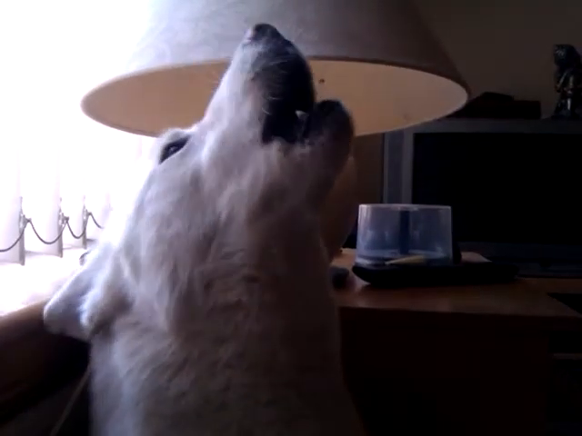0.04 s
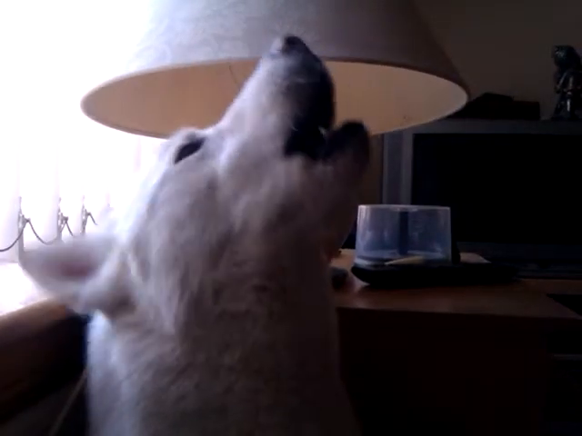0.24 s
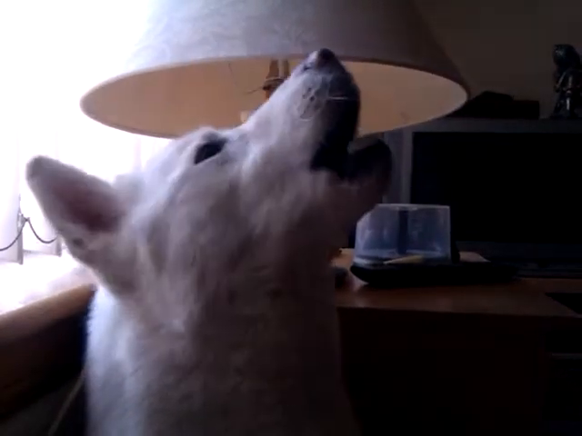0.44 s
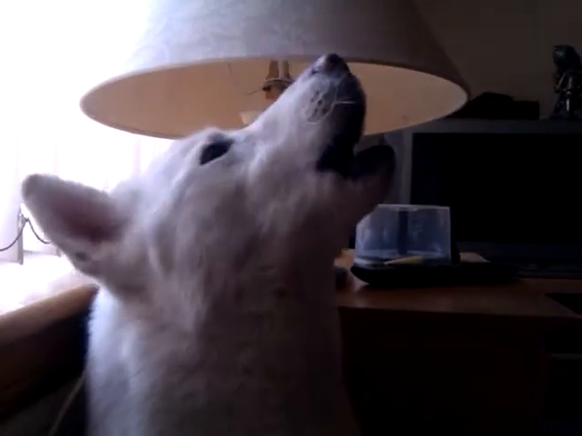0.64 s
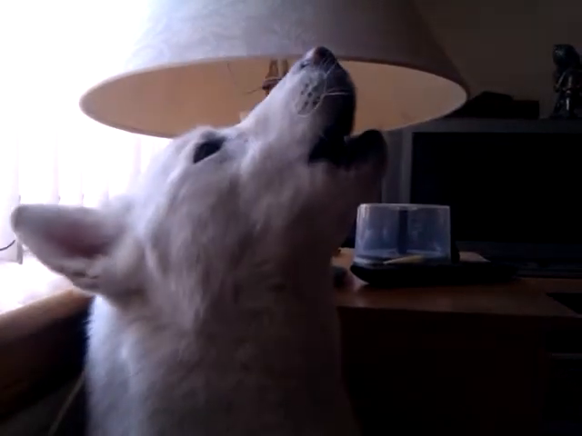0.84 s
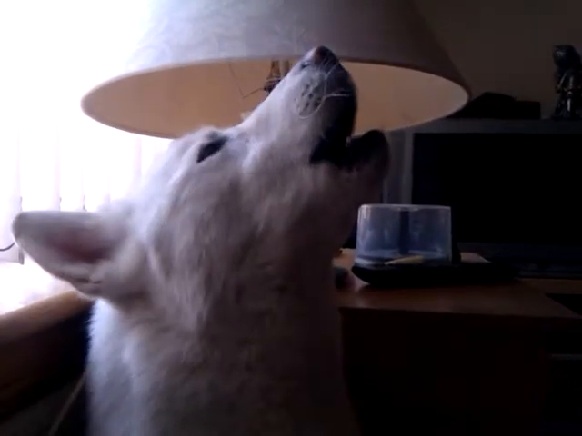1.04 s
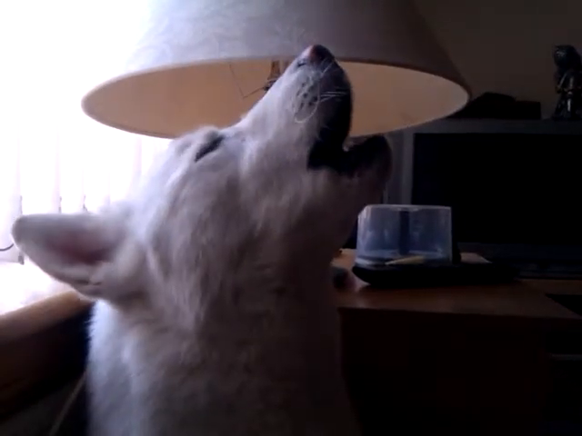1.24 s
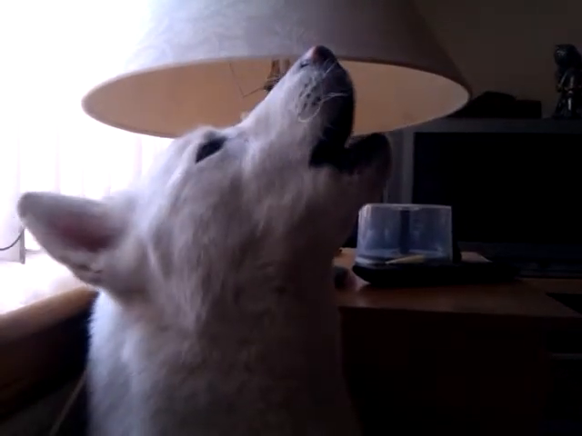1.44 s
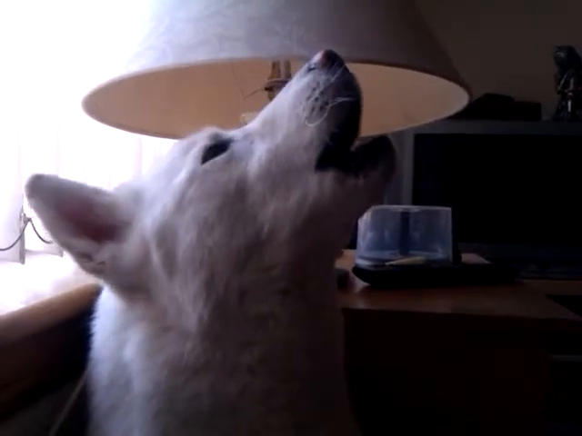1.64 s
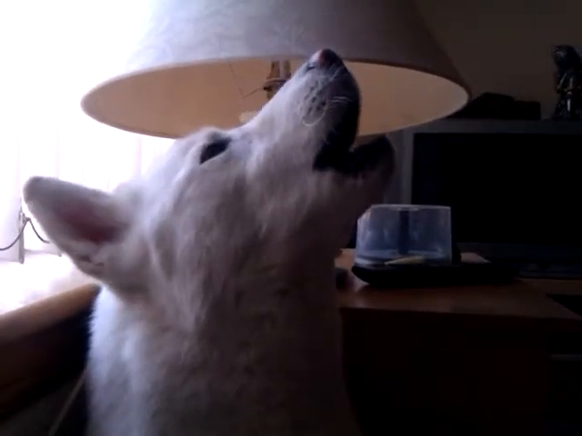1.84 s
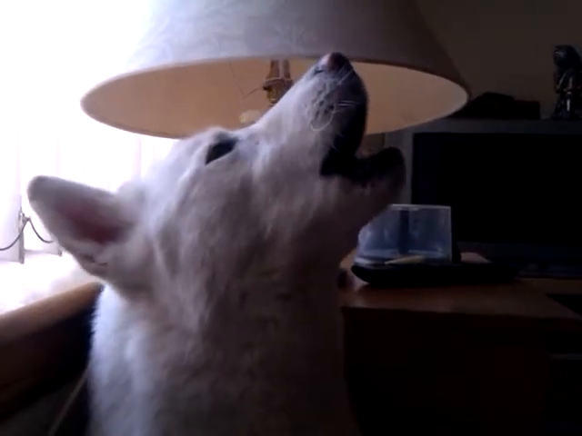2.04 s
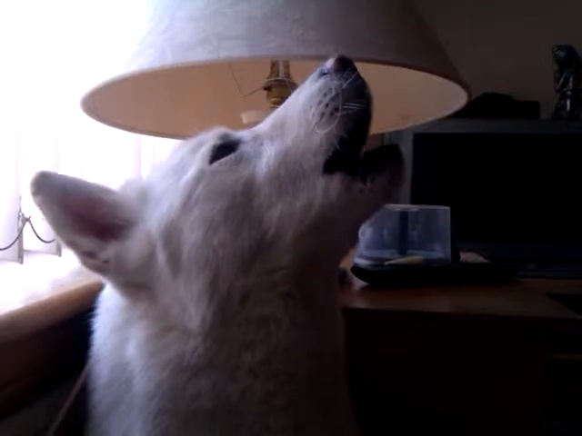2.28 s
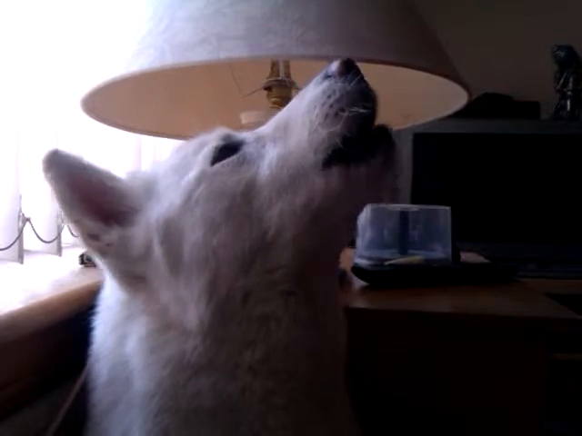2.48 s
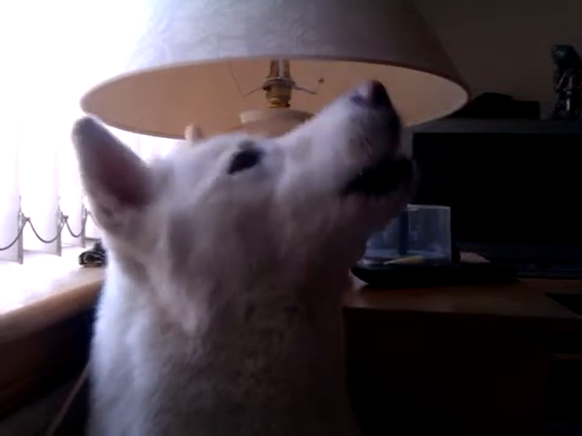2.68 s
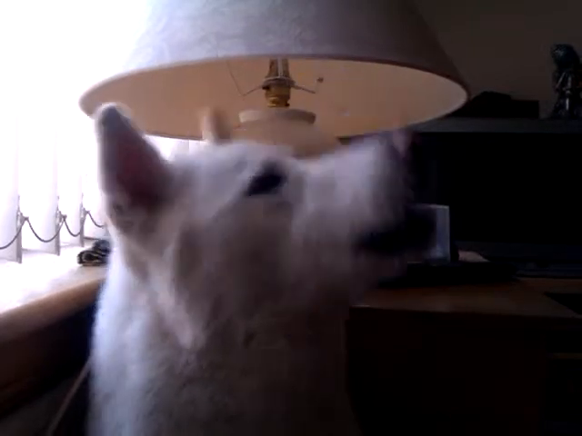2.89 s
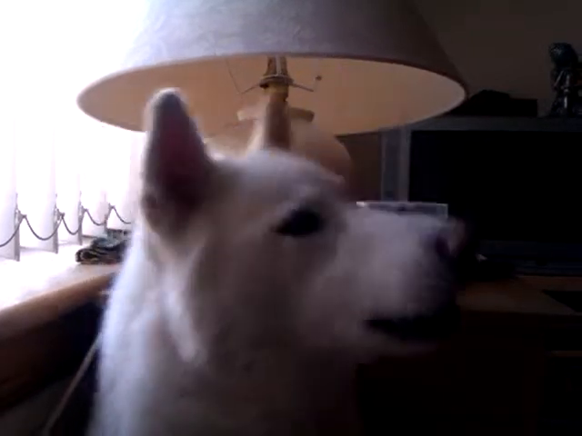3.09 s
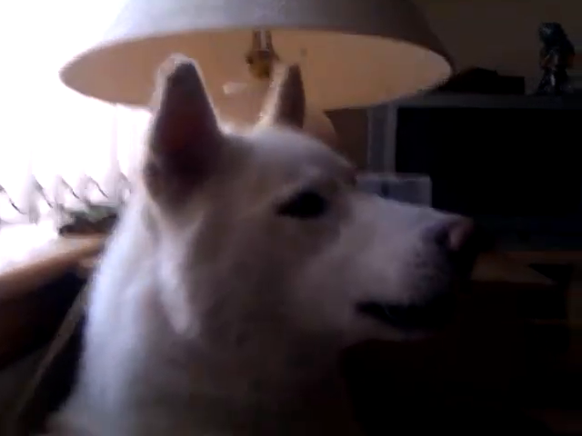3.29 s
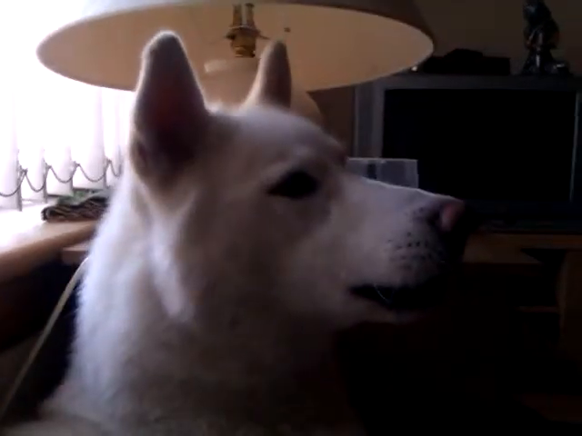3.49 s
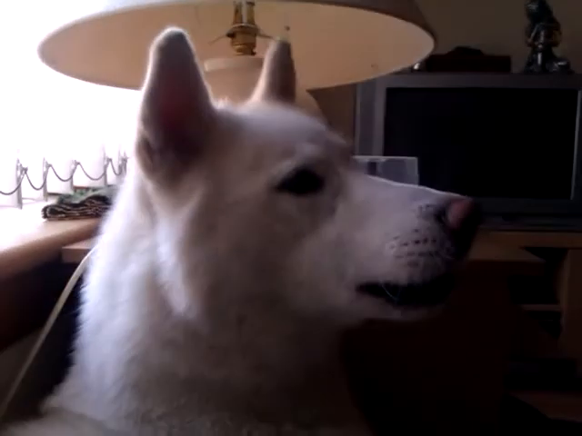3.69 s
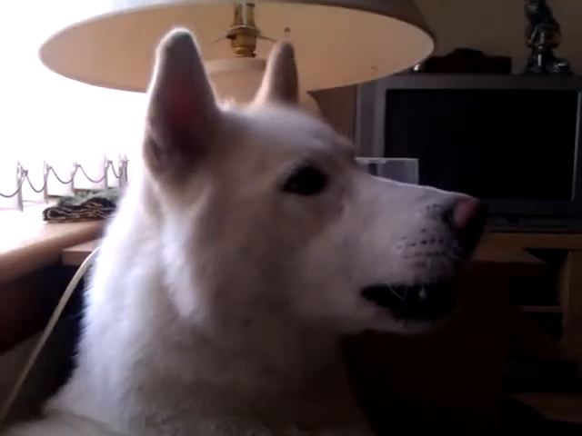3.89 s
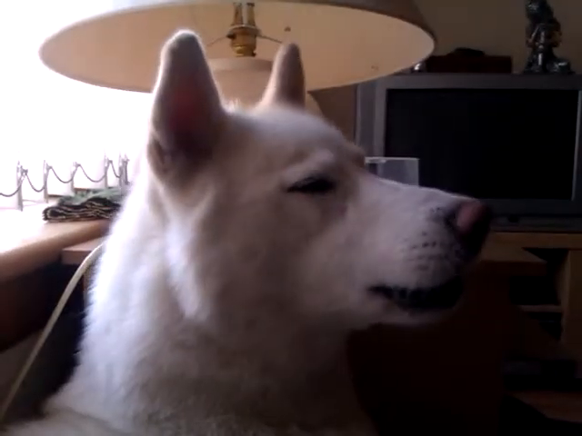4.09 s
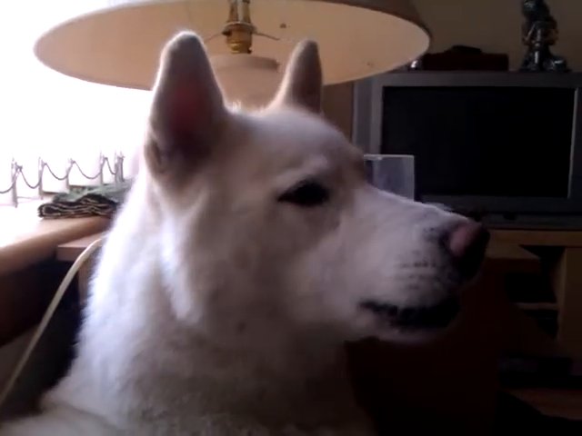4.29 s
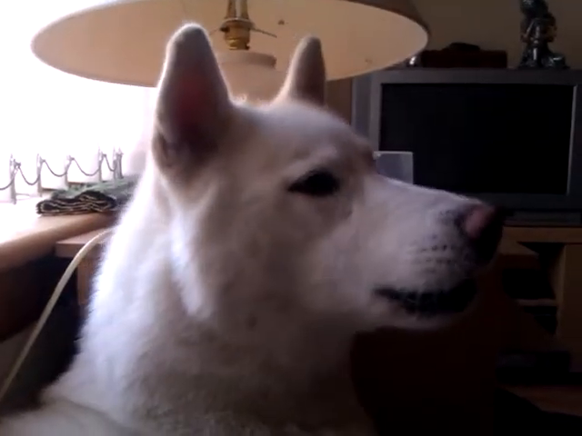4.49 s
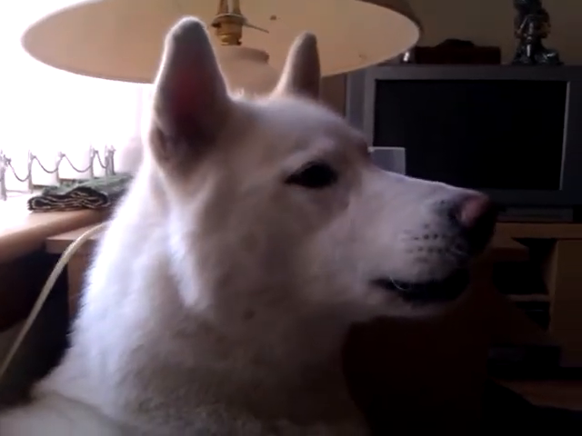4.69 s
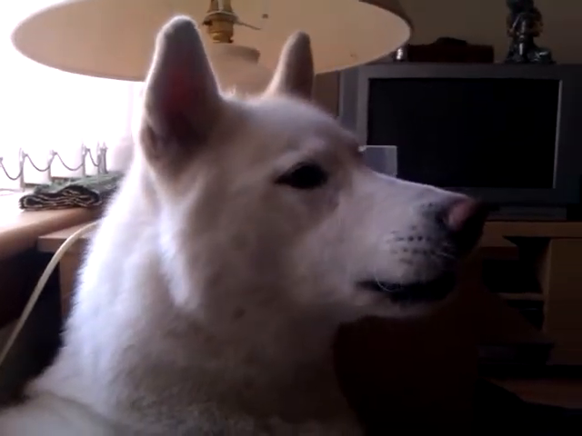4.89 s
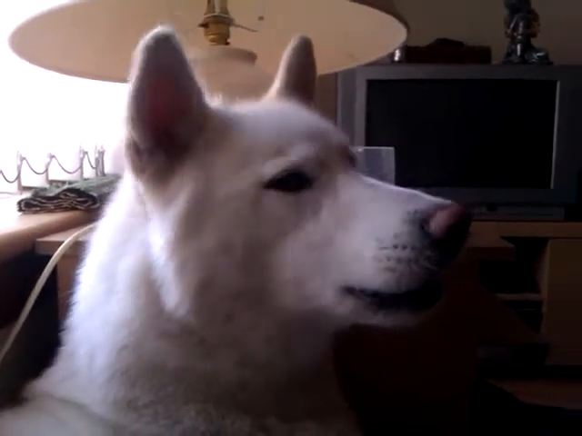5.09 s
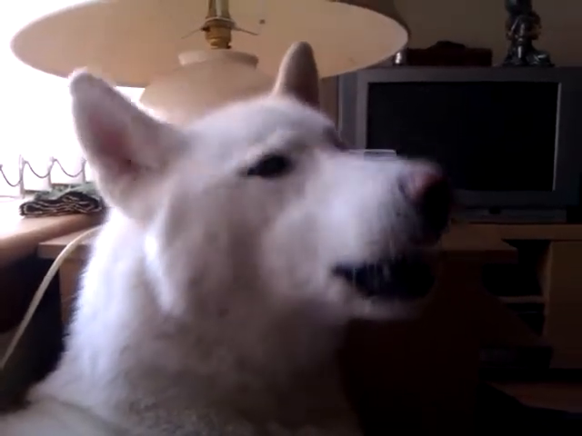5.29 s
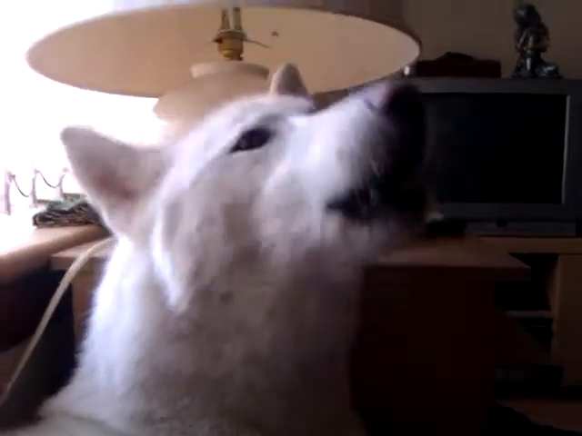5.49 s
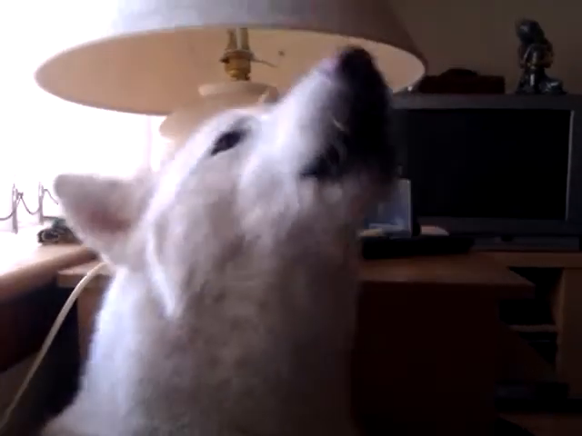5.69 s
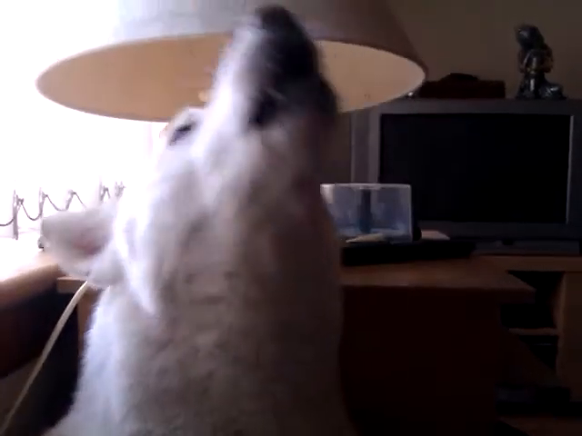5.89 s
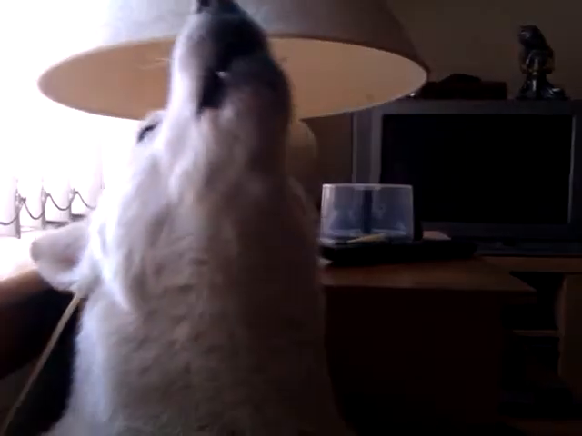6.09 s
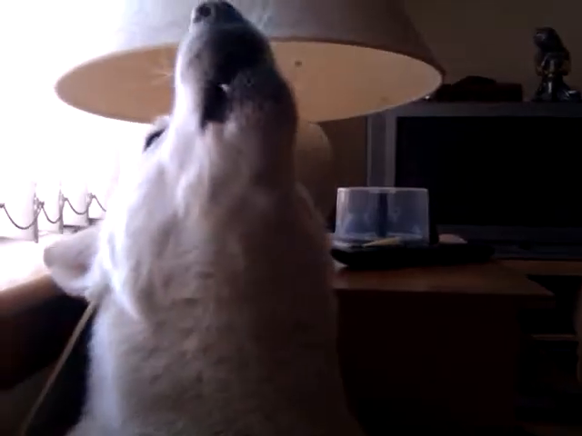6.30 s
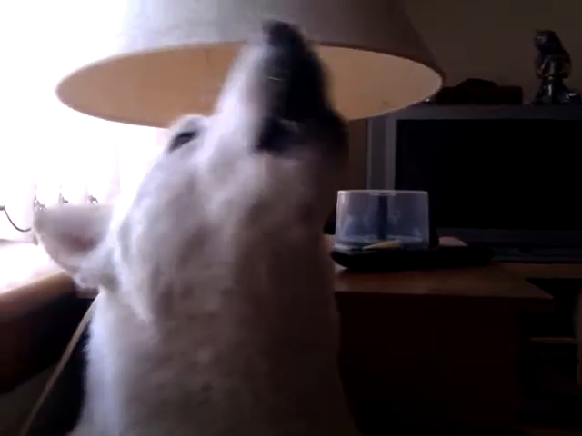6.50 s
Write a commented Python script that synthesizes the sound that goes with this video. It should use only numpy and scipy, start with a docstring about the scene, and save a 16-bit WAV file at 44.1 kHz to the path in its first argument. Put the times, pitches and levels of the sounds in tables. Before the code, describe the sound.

Two loud dog howls in a living room, overloading the microphone, separated by a quiet gap of hiss and small wet mouth clicks.

```python
"""In a living room a dog howls twice, close to a small camera; the first howl is already under way.
Harmonics of the vocal folds pass a throat resonance and the mouth; a second vibration beats against them.
The second howl starts as a hoarse grumble that breaks between registers.
The mouth clicks softly, mostly in the pause, and air whistles in the nose as the first howl ends.
The room answers over steady hiss, and the loud notes overload the camera's input."""
import sys
import numpy as np
from scipy import signal
from scipy.fft import rfft, irfft, next_fast_len
from scipy.io import wavfile
from scipy.ndimage import map_coordinates

SR = 44100
rng = np.random.default_rng(int(sys.argv[2]) if len(sys.argv) > 2 else 0)


def generate_wav(signal):
    """Clip the signal to [-1, 1] and save it as 16-bit WAV at the path in sys.argv[1]."""
    frames = np.transpose(np.atleast_2d(signal))
    scaled = np.clip(frames, -1, 1) * 32767
    pcm = np.round(scaled).astype(np.int16)
    wavfile.write(sys.argv[1], SR, pcm)


N = 288414  # length in samples


def amp(db):
    """Decibels to amplitude: 20 dB is a factor of ten."""
    return 10 ** (np.asarray(db) / 20)


def along(points, hz):
    """Interpolation of (Hz, value) points on a logarithmic frequency axis."""
    point_hz, value = np.transpose(points)
    return np.interp(np.log(hz + 1), np.log(point_hz + 1), value)


def stretch(rows):
    """Linear interpolation in time: sample indices of a table, a soft-edged gate and a curve per column."""
    edge_s = .006
    s, *columns = np.transpose(rows)
    at = np.arange(max(round(s[0] * SR), 0), min(round(s[-1] * SR) + 200, N))
    # no fade where the sound is cut by the first or the last sample
    from_start = at - at[0] + (at[0] == 0) * SR
    to_end = at[-1] - at + (at[-1] == N - 1) * SR
    gate = np.clip(np.minimum(from_start, to_end) / (edge_s * SR), 0, 1)
    return at, gate, [np.interp(at / SR, s, column) for column in columns]


def spells(rows, t, edge_s):
    """Superposition of (start, end, amount) spells that fade in and out over edge_s."""
    return sum(amount * np.clip(np.minimum(t - start, end - t) / edge_s, 0, 1)
               for start, end, amount in rows)


def wobble(size, rate):
    """Band-limited randomness: a smooth curve through random knots, rate of them a second."""
    knots = rng.standard_normal(int(size * rate / SR) + 4)
    return map_coordinates(knots, [np.arange(size) * rate / SR])


def filtered(x, response):
    """Linear filtering: the spectrum of x times a response of frequency."""
    m = next_fast_len(N + SR)
    return irfft(rfft(x, m) * response(np.fft.rfftfreq(m, 1 / SR)), m)[..., :N]


def dog():
    """Source and filter: vocal-fold harmonics, the upper ones coloured by the mouth, plus side sounds."""
    # Voiced stretches between register breaks. Each row: time in seconds, pitch in Hz, level of the three
    # lowest harmonics in dB, throat resonance as a multiple of the pitch, level of the upper harmonics in dB
    # ahead of the mouth's colour.
    held = [(0.0, 475.9, -5, 1.2, -44), (0.2, 473.7, -7, 1.27, -40.5), (0.55, 473, -8.5, 1.27, -41.5),
            (0.67, 477, -9, 1.25, -43), (0.71, 477, -10.5, 1.2, -56), (0.79, 472.3, -9.5, 1.22, -54.5),
            (0.85, 465.9, -7, 1.27, -39), (0.95, 464.3, -7, 1.27, -45), (1.1, 467.7, -6.5, 1.23, -42),
            (1.27, 472.1, -7.5, 1.29, -42.5), (1.35, 482.8, -5.5, 1.28, -46), (1.42, 497.2, 1.5, 0.97, -41),
            (1.49, 504.5, 1, 0.93, -42), (1.56, 497.7, 2.5, 1.04, -45), (1.65, 486.3, -4, 1.25, -42.5),
            (1.85, 481.7, -6, 1.3, -44.5), (1.9, 479.7, -10.5, 1.33, -58), (1.98, 482.5, -5, 1.28, -42.5),
            (2.07, 493.4, -2, 1.13, -44), (2.13, 505.4, 0, 0.95, -41), (2.15, 508.2, -5, 0.95, -45),
            (2.175, 521.2, -20.5, 1.05, -60), (2.2, 508.1, -17, 1.25, -52), (2.24, 508.8, -8, 1.13, -50.5),
            (2.27, 520.7, -15, 1.4, -44)]
    flick = [(2.265, 511, -11.5, 2.05, -53.5), (2.295, 587, -14.5, 1.5, -48.5),
             (2.334, 597, -19, 1.72, -58), (2.356, 640, -20, 1.5, -70), (2.38, 657, -37, 1.9, -75)]
    grumble = [(3.845, 150, -54, 1.15, -84), (3.891, 270, -34.5, 1.3, -63),
               (3.902, 301.8, -32.5, 1.68, -48.5), (3.969, 328.9, -27, 1.56, -49.5),
               (3.99, 367, -28.5, 1.5, -47), (4.05, 376, -24.5, 1.38, -45), (4.101, 411.2, -25, 1.42, -42),
               (4.155, 429, -18, 1.88, -42.5), (4.202, 415.2, -24, 1.52, -45),
               (4.231, 394.3, -23, 1.63, -45), (4.325, 372, -22.5, 1.58, -46)]
    low_register = [(4.32, 244.4, -17.5, 2.8, -53), (4.391, 260, -27, 4.4, -42),
                    (4.445, 242, -19, 2.65, -46.5), (4.5, 231.2, -21.5, 2.6, -50),
                    (4.591, 247.8, -19.5, 2.38, -45), (4.62, 312, -19.5, 2.15, -53)]
    rise = [(4.615, 346.8, -17.5, 1.9, -52), (4.652, 350, -21, 1.57, -52), (4.701, 379, -16.5, 1.4, -47),
            (4.751, 404.3, -14, 1.54, -47), (4.8, 397, -14.5, 1.55, -44.5), (4.87, 385, -18, 1.58, -48.5),
            (4.96, 384, -19.5, 1.43, -48.5), (5.049, 391, -16.5, 1.58, -48),
            (5.15, 411.6, -15.5, 1.49, -46), (5.21, 419.3, -14, 1.68, -46),
            (5.25, 426.1, -12.5, 1.45, -44.5), (5.318, 461, -9.5, 1.6, -36), (5.37, 462.8, -7, 1.86, -34.5),
            (5.45, 449.9, -2, 1.87, -40), (5.56, 432.5, 0, 1.98, -43.5), (5.582, 433.7, -0.5, 1.98, -42.5)]
    last = [(5.585, 490, -10, 1.5, -30), (5.61, 475.5, -7, 1.46, -33), (5.65, 467.3, -9, 1.58, -46),
            (5.74, 452.2, -8.5, 1.56, -42), (5.78, 444, -5.5, 1.4, -43), (5.87, 438.3, -4.5, 1.47, -43.5),
            (6.03, 433.5, -3, 1.49, -45), (6.12, 439.9, -2, 1.42, -43), (6.3, 441.4, -2.5, 1.474, -40.5),
            (6.54, 450.7, -2, 1.6, -42)]
    # Colour of the upper harmonics, lips nearly shut and mouth open. Each row: frequency in Hz, gain in dB.
    shut_shape = [(700, 5.5), (1100, -1.5), (1400, -16), (1850, 8.5), (2100, -4.5), (2420, 6.5),
                  (2750, -12.5), (3200, -2.5), (3900, -18), (4600, -35), (6400, -29), (7500, -52),
                  (11000, -75)]
    open_shape = [(700, 6.5), (1000, 15.5), (1500, 11), (1950, -6.5), (2450, 6.5), (2900, -4), (3600, -14),
                  (4500, -38.5), (6300, -16), (7600, -14), (9300, -34), (10500, -71.5)]

    def coloured(buzz, shape):
        # the lowest frequencies, under 330 Hz, are cut as well
        return filtered(buzz, lambda hz: amp(along(shape, hz)) / (1 + (330 / (hz + 1)) ** 6))

    second = second_vibration()
    stretches = (held, flick, grumble, low_register, rise, last)
    low, buzz = sum(voice(rows, second) for rows in stretches)
    opening = opening_at(np.arange(N) / SR)
    upper = (1 - opening) * coloured(buzz, shut_shape) + opening * coloured(buzz, open_shape)
    return low + second.imag + upper + whistle()


def voice(rows, second):
    """Quasi-periodic oscillation of the vocal folds: the three lowest harmonics, and the buzz above them."""
    # Hoarseness, which adds up. Each row: start in seconds, end in seconds, added roughness from 0 to 1.
    hoarse = [(1.91, 2.06, 0.03), (3.88, 3.995, .65), (3.98, 4.65, 0.04), (4.2, 4.33, .38),
              (4.56, 4.64, .07), (4.63, 5.33, .02), (5.16, 5.24, .045), (5.575, 5.655, .06),
              (5.64, 6.15, 0.01), (2.16, 2.4, 0.04)]
    # Every second cycle differs, heard at half the pitch. Each row: start and end in seconds, share 0 to 1.
    alternate = [(2.152, 2.214, 0.05), (4.103, 4.325, .18)]
    # The pitch shakes. Each row: start in seconds, end in seconds, depth as a share of the pitch.
    quaver = [(4.43, 4.62, .053)]
    quaver_hz, quaver_low_s = 23.6, 4.497  # rate of the shake and a moment at its lowest
    clear_rough = .008  # roughness of the clear voice, 0-1

    at, gate, (hz, low_db, peak, upper_db) = stretch(rows)
    t, size_n = at / SR, len(at)
    rough = np.clip(clear_rough + spells(hoarse, t, .02), 0, 1)
    half = spells(alternate, t, .0063)
    shake = spells(quaver, t, .025) * np.cos(2 * np.pi * quaver_hz * (t - quaver_low_s))

    # roughness scatters the length of the cycles, then their size
    jitter = .25 * rough * wobble(size_n, 200)
    turn = 2 * np.pi * np.cumsum(hz * (1 - shake + jitter)) / SR
    # the second harmonic and the second vibration drift in and out of step
    beat = np.exp(2j * turn) * np.conj(second[at])
    shimmer = 0.61 * rough * wobble(size_n, 260)
    size = 1 + 0.36 * beat.real + half * np.cos(turn / 2) + shimmer
    turn = turn + .3 * beat.imag + .45 * half * np.sin(turn / 2)

    one, two, three = amp(low_db) * throat(hz, peak, opening_at(t))
    low = one * np.sin(turn) + two * np.cos(2 * turn + .6) - three * np.sin(3 * turn)
    buzz = sum(amp(1.5 * wobble(size_n, 9)) * np.cos(k * turn + k * k) for k in range(4, 36))
    # air puffs once a cycle
    breath = (2.6 * np.sqrt(rough) + 4 * rough) * rng.standard_normal(size_n)
    buzz += breath * (1 + np.cos(turn))

    sound = np.zeros((2, N))
    hum = 0.0042 * beat.real  # the beat itself is heard as a low hum
    sound[0, at] = gate * (np.sqrt(2) * size * low + hum)
    sound[1, at] = gate * np.sqrt(2) * size * amp(upper_db) * buzz
    return sound


def throat(hz, peak, opening):
    """Resonance and absorption: sizes of the three lowest harmonics, scaled to a total power of 1."""
    slope_db, damping = -.5, .2  # fall of the source per harmonic; resonance width over its frequency
    nose_hz, nose_width_hz, nose_db = 1289, 61, -9.5  # a side cavity swallows harmonics near this frequency
    lips_hz, lips_width_hz, lips_db = 1840, 200, -48  # shut lips muffle harmonics near this frequency
    k = np.arange(1, 4)[:, None]

    def dip(centre_hz, width_hz):
        return 1 / (1 + ((k * hz - centre_hz) / width_hz) ** 2)

    nose_loss_db = nose_db * dip(nose_hz, nose_width_hz)
    lips_loss_db = (1 - opening) * lips_db * dip(lips_hz, lips_width_hz)
    source = amp(slope_db * k + nose_loss_db + lips_loss_db)
    size = source / np.abs(1 - (k / peak) ** 2 + 1j * damping * k / peak)
    return size / np.linalg.norm(size, axis=0)


def opening_at(t):
    """Articulation: how far the mouth is open, 0-1, which sets the filter of the voice."""
    # Each row: time in seconds, opening from 0 to 1.
    mouth_opening = [(0, .35), (2.1, .45), (2.2, .7), (2.26, .7), (2.29, 0.47), (3.85, 0.35), (4.02, 0),
                     (4.42, 0), (4.5, 0.74), (4.7, 0.88)]
    return np.clip(np.interp(t, *np.transpose(mouth_opening)), 0, 1)


def second_vibration():
    """A second oscillator in the larynx as a rotating phasor, whose angle is the integral of frequency."""
    # One table per spell, a little under the second harmonic of the voice.
    # Each row: time in seconds, frequency in Hz, level in dB.
    second_spells = [
        [(0, 858, -16.5), (.13, 860, -23), (.24, 856, -14), (.44, 854.5, -11), (.67, 856, -14), (.72, 853, -29),
         (.8, 849, -32.5), (.94, 844, -22), (1.05, 844.5, -17), (1.2, 856, -20), (1.35, 880, -18.5),
         (1.39, 887, -34), (1.52, 897, -36), (1.58, 896, -50)],
        [(2.165, 900, -40.5), (2.195, 897, -24), (2.225, 904, -41.5)],
        [(5.585, 850, -22), (5.62, 835, -16.5), (5.72, 806, -27), (5.78, 794, -38), (6.0, 775, -40.5),
         (6.1, 775, -55)],
    ]
    out = np.zeros(N, complex)
    for rows in second_spells:
        at, gate, (hz, db) = stretch(rows)
        hz = hz + 3 * wobble(len(at), 40)
        out[at] = gate * np.sqrt(2) * amp(db) * np.exp(2j * np.pi * np.cumsum(hz) / SR)
    return out


def whistle():
    """Air whistling in the nose as the howl ends: nearly a pure tone, of unsteady amplitude."""
    # Each row: time in seconds, frequency in Hz, mean level in dB.
    nose_tone = [(2.35, 5305, -72), (2.39, 5300, -58), (2.55, 5295, -63), (2.62, 5310, -76)]
    out = np.zeros(N)
    at, gate, (hz, db) = stretch(nose_tone)
    size = np.sqrt(2) * amp(db + 1.5 * wobble(len(at), 43))
    out[at] = gate * size * np.sin(2 * np.pi * np.cumsum(hz) / SR)
    return out


def mouth():
    """Damped cavity resonance: each click is a few cycles of a small wet cavity and a short crackle."""
    # Each row: start in seconds, nominal level in dB, frequency of the cavity in Hz.
    clicks = [(3.1497, -30, 3890), (3.191, -40, 2120), (3.3271, -46.5, 6880), (3.3425, -46, 601),
              (3.3593, -44.5, 3380), (3.4338, -46.5, 6170), (3.8202, -48.5, 3400), (2.948, -48, 7200),
              (4.508, -30, 6600)]
    ring_t60, crackle_t60 = 0.012, .02  # seconds to fall by 60 dB
    out, t = np.zeros(N + SR), np.arange(1500) / SR
    for s, db, hz in clicks:
        ring = 0.74 * amp(-60 * t / ring_t60) * np.sin(2 * np.pi * hz * t)
        crackle = .5 * amp(-60 * t / crackle_t60) * np.diff(rng.standard_normal(len(t) + 1))
        out[round(s * SR):][:len(t)] += amp(db + 1) * (ring + crackle)
    return filtered(out[:N], lambda hz: 1 / (1 + (hz / 9500) ** 6))


def room(x):
    """Reverberation: convolution with noise that decays exponentially, at a rate set by frequency."""
    # Each row: frequency in Hz, reverberation time to -60 dB in seconds, gain in dB.
    bands = [(200, 0.19, -20), (533.4, 0.46, -13), (640, 0.37, -14), (1020, .4, -13.5), (1360, 0.43, -18),
             (3986, 0.32, -9.5), (10000, 0.098, -21.5)]
    band_hz, t60, db = np.transpose(bands)
    hz, t, z = signal.stft(rng.standard_normal(SR), SR, nperseg=512)
    fade = amp(-60 * t / along(np.c_[band_hz, t60], hz)[:, None])
    tail = signal.istft(z * fade, SR, nperseg=512)[1]
    delayed = np.pad(x, (300, 0))  # samples before the answer sets in
    wet = signal.fftconvolve(delayed, tail / np.linalg.norm(tail))[:N]
    return filtered(wet, lambda f: amp(along(np.c_[band_hz, db], f)))


def hiss():
    """Stationary noise of a shaped spectrum: room tone and microphone hiss."""
    # Each row: frequency in Hz, relative spectral density in dB.
    spectrum = [(5, 4), (30, -1), (100, -9), (150, -13), (330, -14.5), (600, -11), (1900, -17),
                (4600, -17.5), (15500, -28)]
    level_db = -62  # rms
    x = filtered(rng.standard_normal(N), lambda hz: amp(along(spectrum, hz)))
    return amp(level_db) * x / np.std(x)


def scene():
    """Superposition: direct sound of the dog, the room's answer and the background."""
    near = dog() + mouth()
    return (near + room(near) + hiss())[None]


def record(dry):
    """Saturation and band limit: the input cuts loud peaks off flat and keeps nothing above its top."""
    ceiling, hardness = .71, 40.0  # amplitude of the cut; sharpness of its corner
    top_hz = 15700
    flat = dry / (1 + np.abs(dry / ceiling) ** hardness) ** (1 / hardness)
    return filtered(flat, lambda hz: hz < top_hz)


dry = scene()
out = record(dry)
generate_wav(out)
```